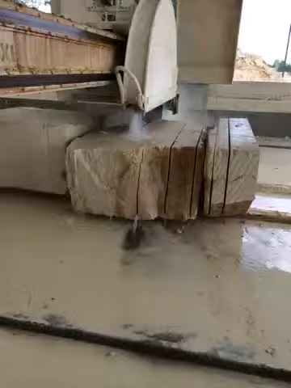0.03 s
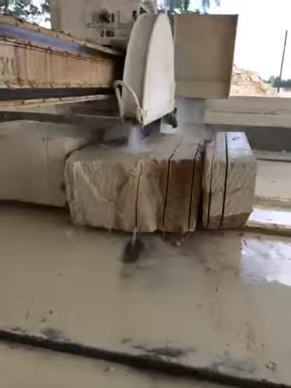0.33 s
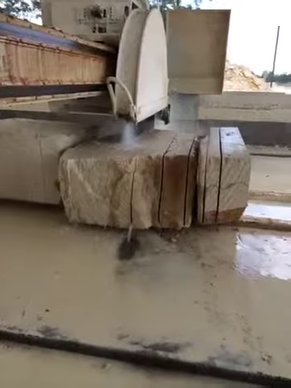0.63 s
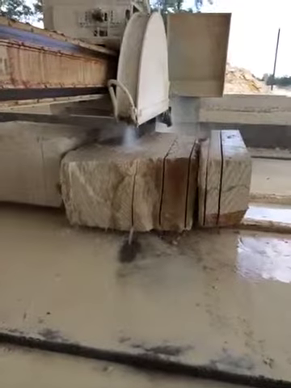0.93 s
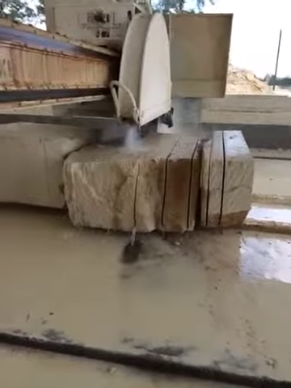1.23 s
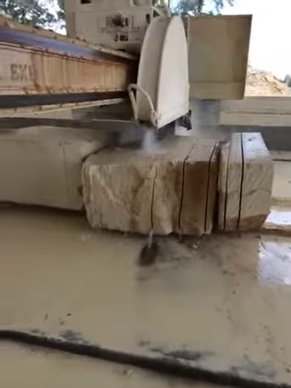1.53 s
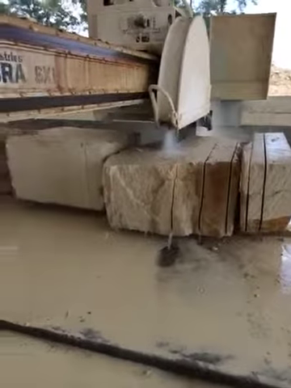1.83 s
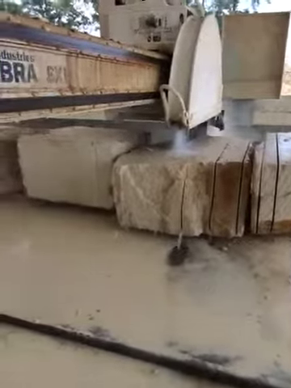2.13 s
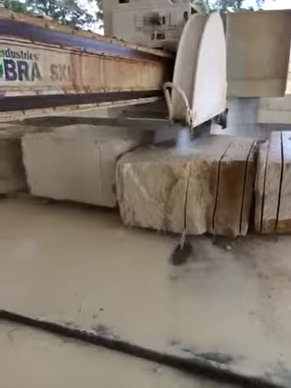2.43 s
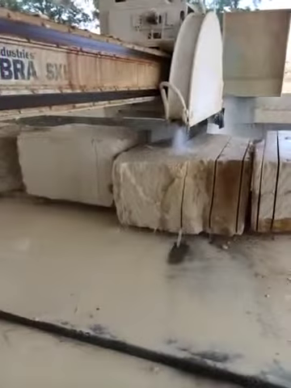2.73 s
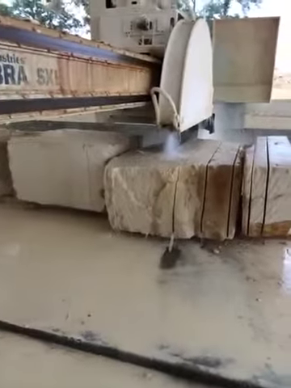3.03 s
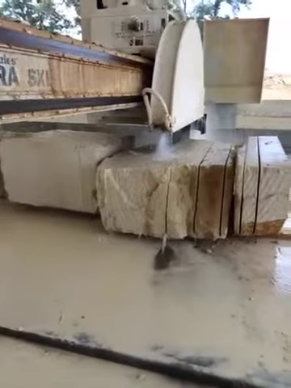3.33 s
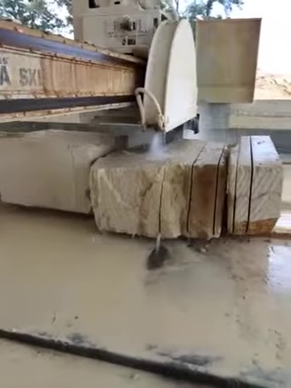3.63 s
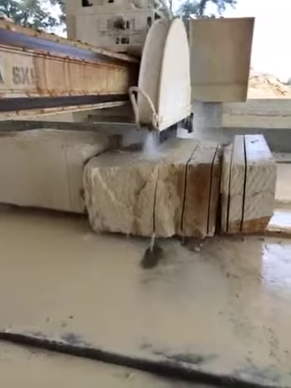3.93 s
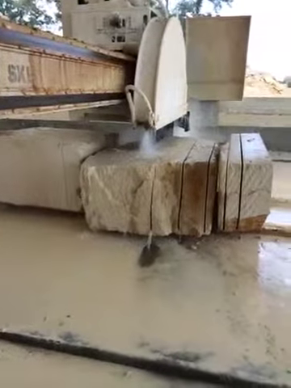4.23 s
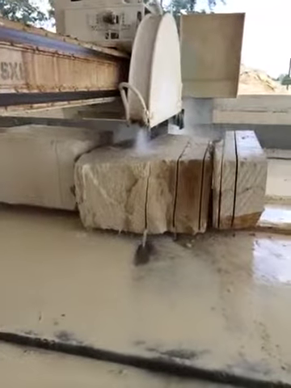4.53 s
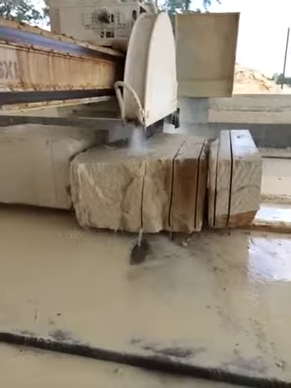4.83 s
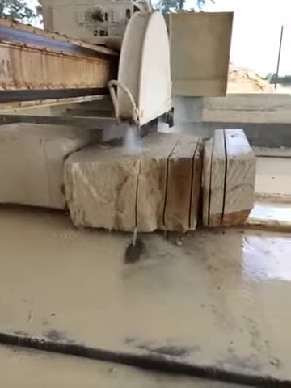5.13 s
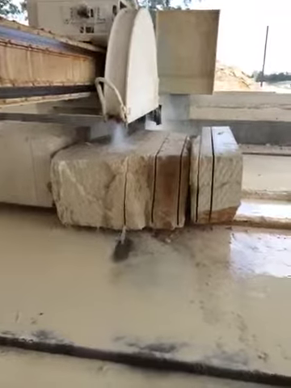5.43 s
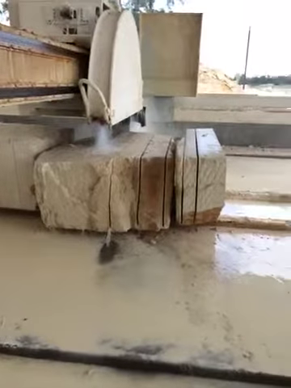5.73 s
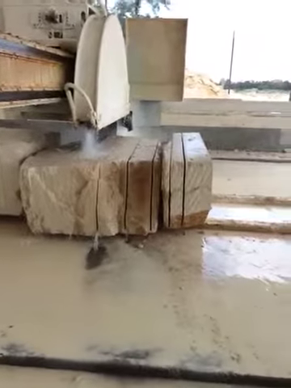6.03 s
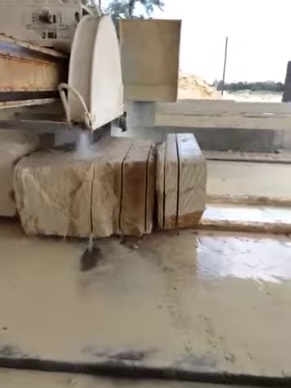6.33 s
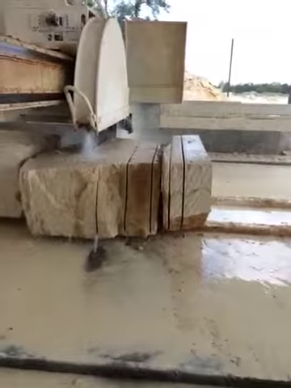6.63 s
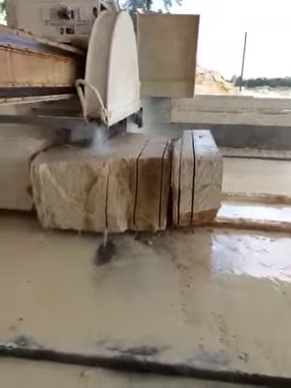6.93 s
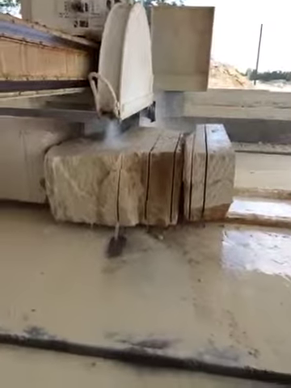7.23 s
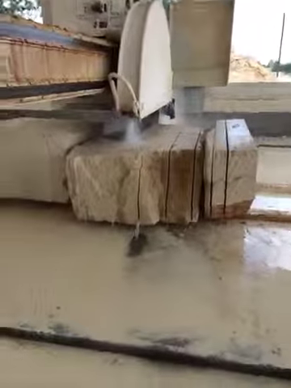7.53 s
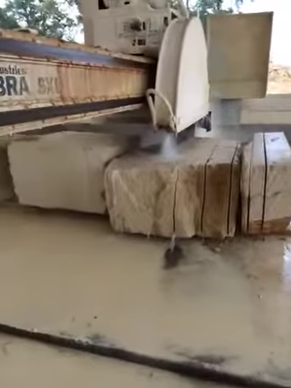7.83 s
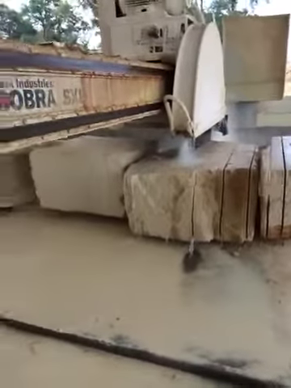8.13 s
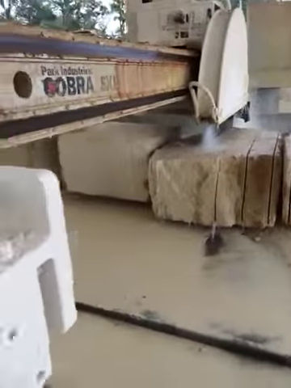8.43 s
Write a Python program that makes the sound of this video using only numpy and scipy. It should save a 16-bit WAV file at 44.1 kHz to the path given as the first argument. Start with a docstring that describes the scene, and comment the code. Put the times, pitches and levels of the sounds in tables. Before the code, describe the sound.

A large circular saw grinds steadily through wet stone, a gritty roar with hissing water and a thin, wavering whine.

```python
"""A gritty roar cuts in: a big circular saw grinding through a wet stone block in an open shed.
Its 120 segments scrape the slot and add a thin whine; the slightly warped blade rubs the slot wall
and sings in pulses. Cooling water hisses off the rim, throbbing once a turn.
A drive hums underneath, and a few dull bumps sound in the low end."""
import sys
import numpy as np
from scipy import signal
from scipy.fft import rfft, irfft, next_fast_len
from scipy.io import wavfile

SR = 44100
rng = np.random.default_rng(int(sys.argv[2]) if len(sys.argv) > 2 else 0)


def store_wav(level_fs):
    """Save 16-bit WAV to argv[1]."""
    pcm = np.round(np.clip(np.atleast_2d(level_fs), -1, 1) * 32767)
    wavfile.write(sys.argv[1], SR, pcm.T.astype(np.int16))


N = 377937
TIME, HZ = np.arange(N) / SR, np.fft.rfftfreq(N, 1 / SR)
TURN_HZ, SEGMENTS = 9.464, 120


def amp(db):
    """Decibels to gain."""
    return 10 ** (np.asarray(db) / 20)


def unit(x):
    """Scales to rms 1."""
    return x / np.sqrt(np.mean(abs(x) ** 2) + 1e-20)


def bell(x, centre, width):
    """A bell of height 1 and the given width at half height."""
    return .5 ** ((2 * (x - centre) / width) ** 2)


def curve(rows):
    """Joins (seconds, value) rows by straight lines."""
    return np.interp(TIME, *np.transpose(rows))


def colour(x, spectrum, lifts=()):
    """Filters by a smooth spectrum with resonant lifts on top; rms 1."""
    points_hz, points_db = np.transpose(spectrum)
    smooth_db = np.interp(np.log(HZ + 1), np.log(points_hz), points_db)
    lift_db = sum(db * bell(HZ, hz, width_hz) for hz, width_hz, db in lifts)
    return unit(irfft(rfft(x) * amp(smooth_db + lift_db), N))


def band(hz, width_hz):
    """Complex noise in one resonance: a slow random envelope carried at its pitch."""
    step = max(1, int(SR / (32 * width_hz)))
    size = next_fast_len(N // step + 2)
    noise = rng.standard_normal((2, next_fast_len(N + 2)))[:, :size].T @ [1, 1j]
    response = np.sqrt(bell(np.fft.fftfreq(size, step / SR), 0, width_hz))
    slow_noise = np.fft.ifft(np.fft.fft(noise) * response)
    envelope = unit(np.interp(TIME, np.arange(size) * step / SR, slow_noise))
    return envelope * np.exp(2j * np.pi * hz * TIME)


def wavering_tone(hz, width_hz):
    """A tone of steady level and unsteady pitch; rms 1."""
    return unit(np.cos(np.angle(band(hz, width_hz))))


def drift(rate_hz):
    """Smooth random motion; rms 1."""
    return unit(band(0, 2 * rate_hz).real)


def thud(peak_s, rise_s, decay_s):
    """An envelope that swells to 1 and dies away."""
    age_s = TIME - peak_s
    return np.exp(-(np.minimum(age_s, 0) / rise_s) ** 2 - np.maximum(age_s, 0) / decay_s)


def each_turn(turns, size):
    """A random pattern around the rim that comes back every turn."""
    return unit(np.interp(turns % 1, np.arange(size) / size, rng.standard_normal(size), period=1))


def wall_rub(turns, lead_turns=0.13):
    """The warped blade leans on the slot wall once a turn, just before its deepest bite: -1 to 1."""
    return np.cos(2 * np.pi * (turns + lead_turns))


# Dull bumps. Each row: peak time, rise and decay in seconds, pre-filter level in dB, pitch and width in Hz.
BUMP_EVENTS = [(.655, 0.06, 0.064, -26.5, 161, 70), (.69, .02, .025, -22.5, 100, 30),
               (.85, 0.074, 0.12, -31, 198.3, 40), (1.145, 0.025, 0.073, -18.5, 183.3, 11.5),
               (1.168, 0.028, 0.022, -18, 88, 22), (1.18, 0.052, 0.15, -29, 275, 46),
               (4.755, 0.02, .04, -21, 66, 26), (4.805, .025, 0.038, -21.5, 104, 12),
               (4.815, 0.034, 0.079, -21.5, 190, 42), (5.035, .03, 0.045, -27, 92, 25)]

def bumps(band_hz=(57, 330)):
    """Soft low thuds: each swells, booms at an unsteady pitch and dies away."""
    booms = sum(amp(db) * thud(peak_s, rise_s, decay_s) * wavering_tone(hz, width_hz)
                for peak_s, rise_s, decay_s, db, hz, width_hz in BUMP_EVENTS)
    return signal.sosfiltfilt(signal.butter(3, band_hz, "bandpass", fs=SR, output="sos"), booms)


# Drive rumble. Each row: frequency in Hz, relative level in dB.
RUMBLE_SPECTRUM = [(15, -34), (25, -27), (45, -11.5), (62, -6.5), (80, 2), (105, -4), (130, -5), (155, -4),
                   (200, -2.5), (240, -10), (400, -26), (1000, -62)]
# Rumble between bumps. Each row: time in seconds, level in dB.
RUMBLE_DB = [(.2, -37), (1.85, -34.5), (2.1, -39.5), (2.85, -35.5), (4.1, -40), (5.1, -39), (6.5, -37),
             (7.6, -38.5), (8.5, -38.5)]
# Steady hum lines: the drive's near 89 and 182 Hz, with further steady tones up to 597 Hz. Each row: pitch and
# width in Hz, level in dB.
HUM_LINES = [(88.8, 4, -46), (181.7, 8, -43.5), (273, 4, -53.5), (393.6, 4.5, -51), (494.4, 3.5, -51),
             (596.6, 3, -47.5)]

def drive(sway_db=1.25, shake_db=-17.5, shake_decay_s=0.52):
    """Motor and belts hum and rumble in the steel bridge, which shakes on after each bump; steady tones near
    400 to 600 Hz sound along with the hum."""
    shake_power = sum((amp(db + shake_db) * thud(peak_s, rise_s, shake_decay_s)) ** 2
                      for peak_s, rise_s, _, db, _, _ in BUMP_EVENTS)
    gain = np.sqrt(amp(curve(RUMBLE_DB)) ** 2 + shake_power) * amp(sway_db * drift(rate_hz=7.4))
    rumble = gain * colour(rng.standard_normal(N), RUMBLE_SPECTRUM)
    hum = sum(amp(db) * unit(band(hz, width_hz).real) for hz, width_hz, db in HUM_LINES)
    return rumble + hum


# Water hiss. Each row: frequency in Hz, relative level in dB.
SPRAY_SPECTRUM = [(500, -17), (2500, 1.5), (4200, -1.5), (5400, -6.5), (6300, -0.5), (8000, -0.5),
                  (9800, 0), (10700, -2), (13000, -2), (15300, -8)]
# Hood resonances. Each row: centre and width in Hz, lift in dB.
HOOD_LIFTS = [(6115, 410, 6), (7220, 600, 4), (8740, 300, 3), (9800, 400, 1.2), (11300, 320, 3.5),
              (12500, 450, 1), (14100, 300, 2), (15000, 600, 4.5)]
# Brighter rushes. Each row: peak time and length in seconds, centre and width in Hz, level in dB.
SPRAY_RUSHES = [(1.88, 0.3, 7300, 1000, -40), (2.4, 0.51, 2590, 900, -34), (3.45, .45, 6900, 1100, -39),
                (3.38, .3, 10900, 6000, -38), (4.1, 0.78, 3480, 500, -36), (7.25, .35, 2850, 800, -33),
                (7.85, 0.86, 5150, 800, -41.5), (7.9, 1.4, 12600, 3000, -37)]

def spray(turns, level_db=-28.5, throb_db=0.5, uneven_db=-0.5, splutter_db=.5, sway_db=0.4):
    """Water is flung from the rim and hisses under the hood, a little stronger once a turn."""
    flow_db = throb_db * np.cos(2 * np.pi * turns) + uneven_db * each_turn(turns, size=SEGMENTS)
    flow_db += splutter_db * drift(rate_hz=80)
    hiss = colour(rng.standard_normal(N), SPRAY_SPECTRUM, HOOD_LIFTS)
    hiss *= amp(level_db + sway_db * drift(rate_hz=3))
    rushes = sum(amp(db) * bell(TIME, peak_s, length_s) * unit(band(hz, width_hz).real)
                 for peak_s, length_s, hz, width_hz, db in SPRAY_RUSHES)
    return amp(flow_db) * (hiss + rushes)


# Blade modes. Each row: peak time and length in seconds, pitch and width in Hz, level in dB.
BLADE_MODES = [(0.78, .8, 2273, 8.6, -41), (1.45, 0.23, 2273, 7.9, -38), (0.47, .25, 3420, 12.1, -38),
               (3, .5, 2274, 8, -43), (3.6, .7, 1395, 20, -37.5), (2.9, 1.5, 1800, 22, -39),
               (7, 1.8, 1398, 16, -36), (6.55, 0.4, 2500, 23, -36), (7.3, 0.42, 2600, 25, -37)]

def singing(turns, rub_db=7):
    """The blade rubs the slot wall once a turn, so its modes sing in pulses."""
    tones = sum(amp(db) * bell(TIME, peak_s, length_s) * wavering_tone(hz, width_hz)
                for peak_s, length_s, hz, width_hz, db in BLADE_MODES)
    return tones * unit(amp(rub_db * wall_rub(turns)))


# The whine's first and second partials. Each row: time in seconds, level in dB.
WHINE_FIRST_DB = [(.2, -41), (1.5, -37.5), (2.8, -35), (3.4, -41), (4.35, -42), (4.6, -33), (5.5, -30.5),
                  (5.95, -34.5), (6.4, -33), (6.9, -39), (7.55, -38), (7.95, -27.5), (8.5, -30.5)]
WHINE_SECOND_DB = [(.2, -41), (.8, -39), (1.45, -35.5), (2, -43), (3, -38), (3.9, -42), (5.2, -39.5),
                   (7.3, -38), (8.1, -41)]
# Its upper partials. Each row: harmonic number, level in dB.
WHINE_OVERTONES = [(3, -48), (4, -53), (5, -60), (6, -59), (7, -51), (8, -55)]

def whine(turns, waver_db=2, rub_db=3):
    """The segments pass the stone at a steady rate: a harmonic whine that comes and goes."""
    pulse_db = rub_db * wall_rub(turns)  # the second partial meets a blade mode and pulses with it
    partials = [(1, curve(WHINE_FIRST_DB)), (2, curve(WHINE_SECOND_DB) + pulse_db)] + WHINE_OVERTONES
    out = np.zeros(N)
    for harmonic, db in partials:
        tone = np.sin(2 * np.pi * harmonic * SEGMENTS * turns)
        out += amp(db) * unit(amp(waver_db * drift(rate_hz=10)) * tone)
    return out


# Catches on harder stone. Each row: peak time in seconds, level change in dB.
STONE_CATCHES = [(3.22, -0.5), (3.40, 3), (4.03, 1.5), (5.29, 2.5), (6.15, 2), (6.96, 3.5), (7.26, 3.5),
                 (7.70, 2.5), (7.90, 2)]

def load_db(feed_db_per_s=0.06, wander_db=0.5, catch_s=0.034):
    """The load creeps up as the blade feeds in, wanders with the stone and jumps at brief catches."""
    feed_db = feed_db_per_s * (TIME - TIME.mean())
    catches_db = sum(db * bell(TIME, peak_s, catch_s) for peak_s, db in STONE_CATCHES)
    return feed_db + wander_db * drift(rate_hz=14) + catches_db


# Scraped stone and blade. Each row: frequency in Hz, relative level in dB.
GRIND_SPECTRUM = [(30, -44), (120, -27.5), (330, -17), (500, -14.5), (620, -12), (710, -3.5), (790, 1.5),
                  (1050, -5), (1300, -9), (2100, -13), (3100, -16.5), (4200, -23), (5500, -29.5),
                  (15000, -39)]
# Rings of blade and guard. Each row: centre and width in Hz, lift in dB.
RING_LIFTS = [(702, 17, 7.5), (776.5, 20, 3), (1420, 81, 1), (1682, 40, 3), (1845, 136, 4), (2130, 70, 0.5),
              (2306, 190, 2.5), (2410, 70, 3), (2850, 180, 1.2), (3466, 190, 9.8), (3673, 130, 7),
              (4700, 320, 7)]
# Rasp above the roar. Each row: time in seconds, gain in dB.
RASP_DB = [(.2, -0.4), (1.75, -0.6), (2.4, 0.1), (4.6, 1), (5.3, 0.5), (7.35, 0.3), (8.5, 0.5)]

def grinding(turns, level_db=-20.5, repeat=0.36, uneven_db=0.42, runout_db=0.4, grit_db=0.35,
             split_hz=1200, rub_db=0.33, rasp_wander_db=0.21):
    """Uneven segments scrape the slot; their fixed diamonds repeat part of the scrape every turn."""
    scrape = rng.standard_normal(N) + repeat * each_turn(turns, size=4096)
    bite_db = uneven_db * each_turn(turns, size=SEGMENTS) + runout_db * np.cos(2 * np.pi * turns)
    bite_db += grit_db * drift(rate_hz=220)
    grind = colour(scrape * amp(bite_db), GRIND_SPECTRUM, RING_LIFTS)
    roar = signal.sosfiltfilt(signal.butter(3, split_hz, fs=SR, output="sos"), grind)
    rasp = grind - roar
    rasp_db = curve(RASP_DB) + rub_db * wall_rub(turns) + rasp_wander_db * drift(rate_hz=8)
    return amp(level_db) * (roar * amp(load_db()) + rasp * amp(rasp_db))


def scene(speed_wander=.0007, fade_start_s=7.6, fade_db_per_s=-1.4):
    """The saw turns at nearly constant speed and fades a little as the microphone swings away; mono."""
    turns = np.cumsum(TURN_HZ * (1 + speed_wander * drift(rate_hz=1.96))) / SR
    saw = grinding(turns) + whine(turns) + singing(turns) + spray(turns)
    fade = amp(fade_db_per_s * np.maximum(TIME - fade_start_s, 0))
    mono = saw * fade + drive() + bumps()
    return np.array([mono, mono])


def record(dry, start_s=.12, cutoff_hz=15300):
    """The sound starts abruptly; a steep low-pass cuts the top treble."""
    lowpass = signal.firwin(1023, cutoff_hz, window=("kaiser", 9), fs=SR)
    return signal.oaconvolve(dry * (TIME > start_s), lowpass[None], "same")


dry = scene()
out = record(dry)
store_wav(out)
```